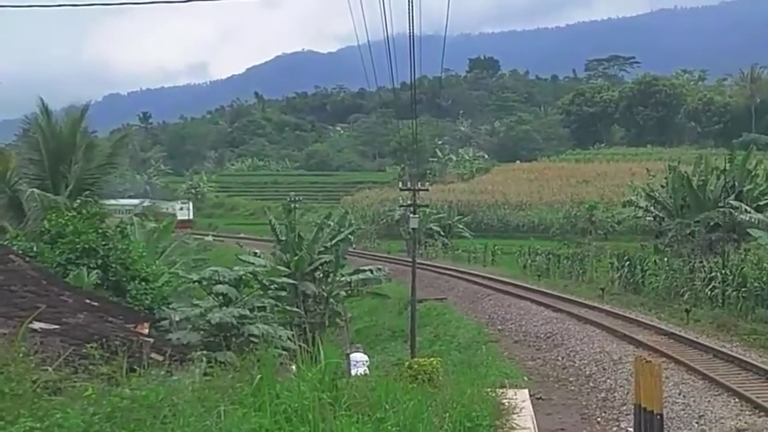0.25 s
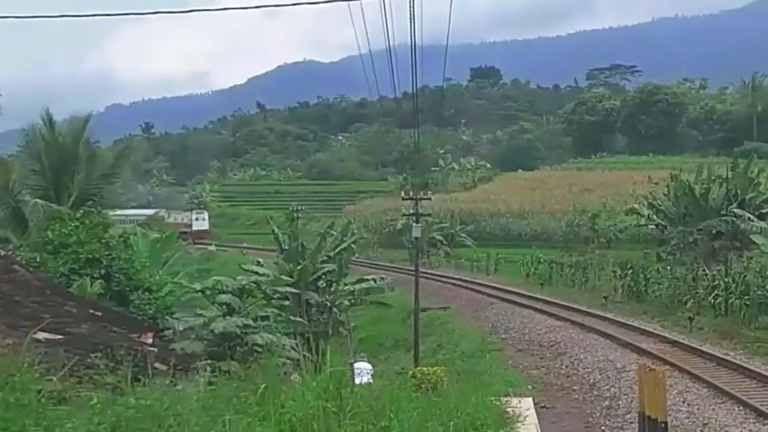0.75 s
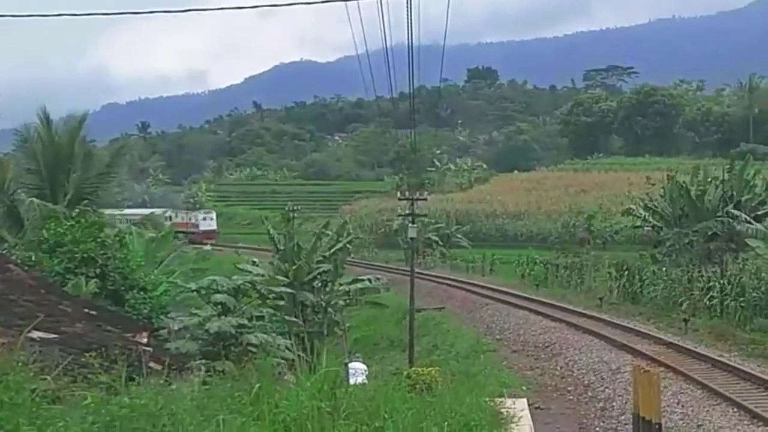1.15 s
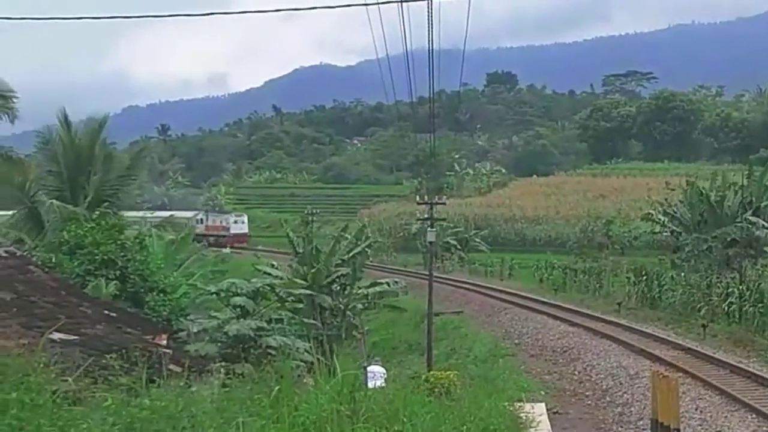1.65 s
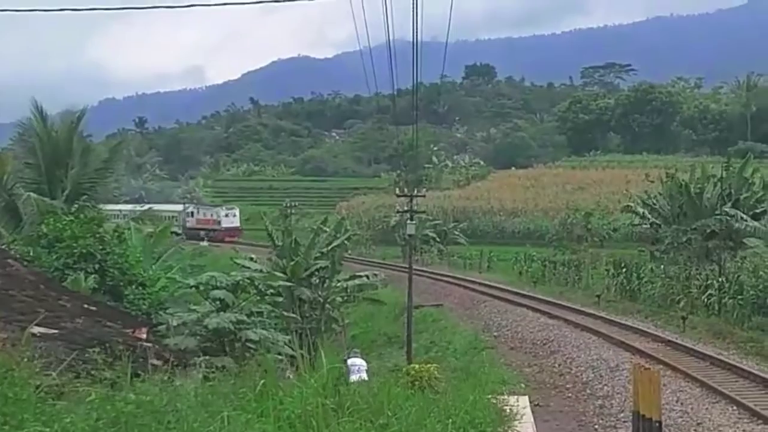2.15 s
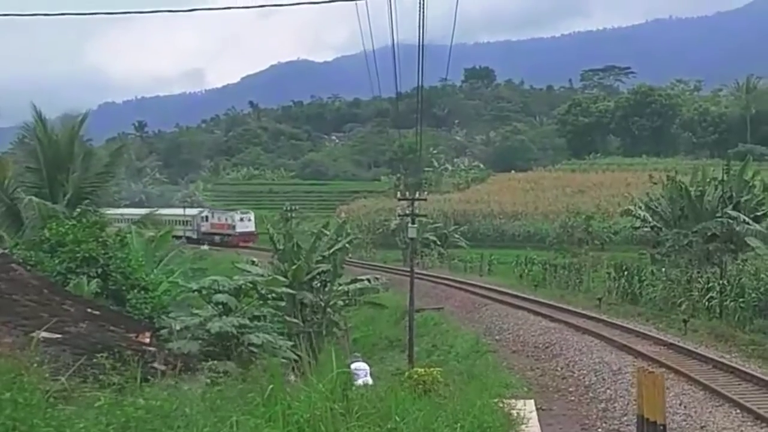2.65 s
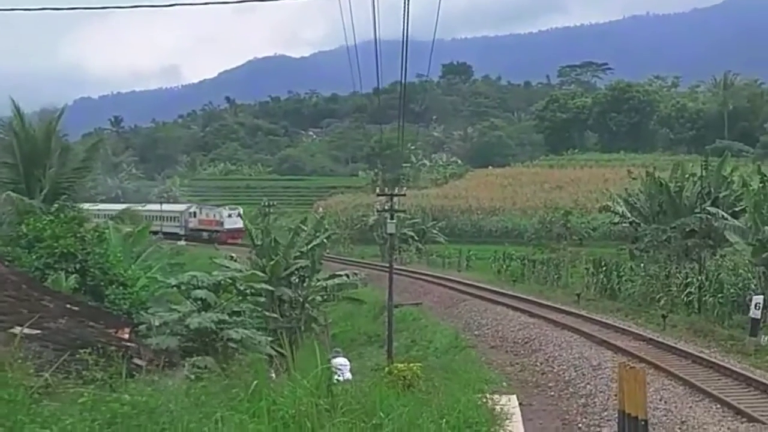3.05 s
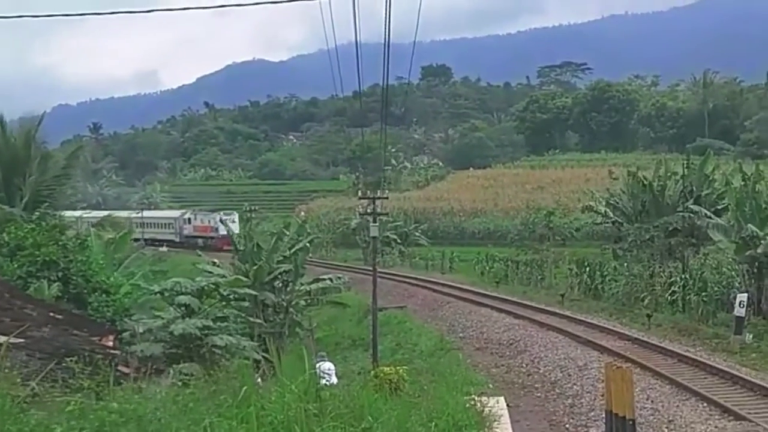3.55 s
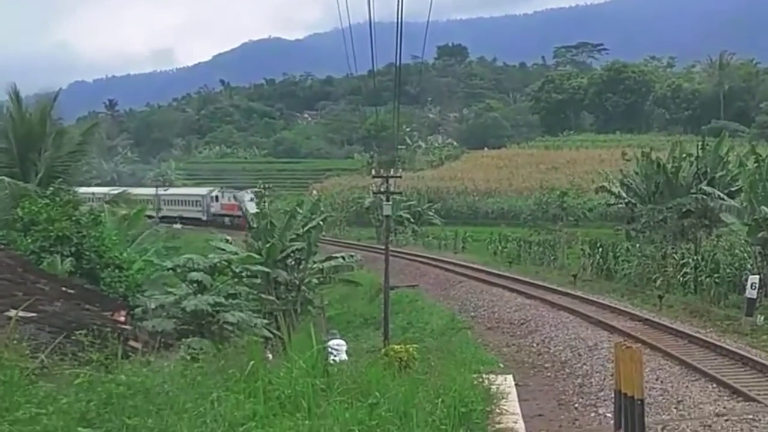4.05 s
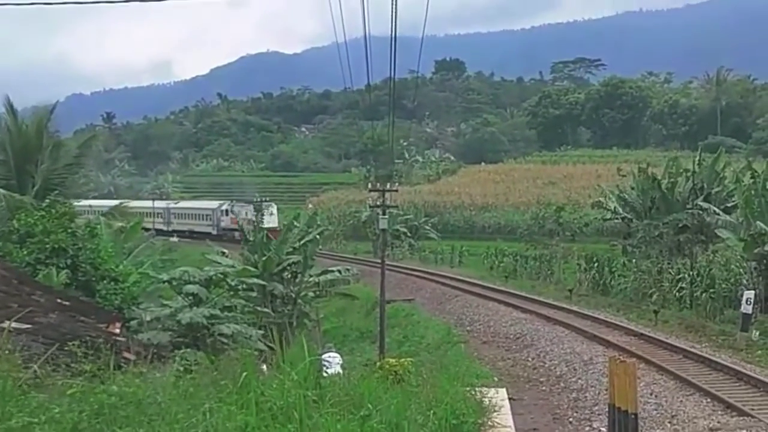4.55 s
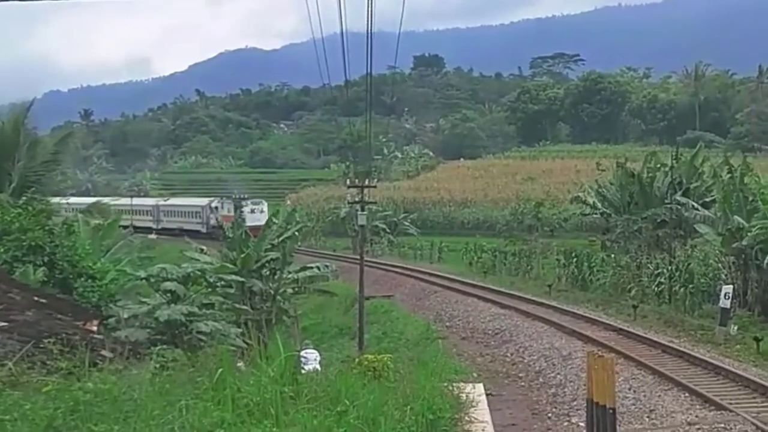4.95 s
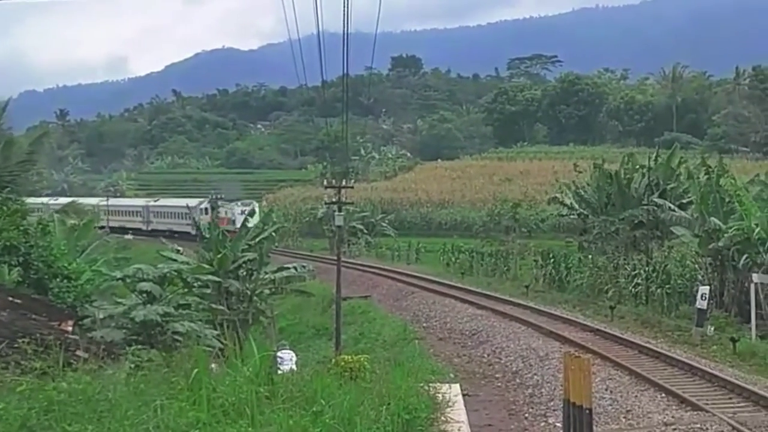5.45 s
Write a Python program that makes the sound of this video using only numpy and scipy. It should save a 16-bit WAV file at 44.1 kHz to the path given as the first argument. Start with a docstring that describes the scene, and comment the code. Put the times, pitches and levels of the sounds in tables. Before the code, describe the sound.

A far-off diesel locomotive pulls passenger cars closer around a bend, its deep throb and uneven chug pulsing rapidly over a soft rumble. Faint clatter and scrapes come from the wheels. Just before four seconds a rasping hiss flares in close spurts, then turns duller, and sharper knocks and louder thumps follow. Heard in mono from beside the track in quiet, open countryside.

```python
"""A deep throb with a chug on every engine cycle: a far-off diesel locomotive pulls cars, slowly nearing.
The throb is a cosine at half the firing rate of eight cylinders; short pressure pulses make the uneven chug.
Chopped noise makes a rasping hiss that flares in three close spurts and grows duller and smoother late on.
Resonant noise gives the clatter, decaying sines the knocks and thumps, narrow noise the scrapes in the bend.
Shaped steady noise gives the rumble of the cars and the hush of open country."""
import sys
import numpy as np
from scipy import signal
from scipy.fft import rfft, irfft
from scipy.io import wavfile
from scipy.ndimage import uniform_filter1d

SR = 44100
rng = np.random.default_rng(int(sys.argv[2]) if len(sys.argv) > 2 else 0)


def wrap_up_sound(samples):
    """Save the sound to the file named by the first command line argument, as 16-bit audio."""
    columns = np.atleast_2d(samples).T
    # keep every value between -1 and 1, then stretch to whole-number steps
    tamed = np.clip(columns, -1, 1)
    steps = np.round(tamed * 32767).astype(np.int16)
    wavfile.write(sys.argv[1], SR, steps)


N = 250929
T = np.arange(N) / SR  # time in seconds

CYCLE_HZ = 6.8225  # engine cycles per second
EDGE_HZ = 15600  # upper limit of the whole sound

# Exhaust as it carries over the fields, before trim. Each row: time in seconds, boom in dB, bark in dB.
EXHAUST_LEVELS = [(0, -41.5, -47), (0.4, -50.5, -48.5), (0.95, -42, -46.5), (1.25, -50, -45.0),
                  (1.6, -45, -52.5), (2.0, -41, -49), (2.45, -45.0, -51.0), (3.2, -42.5, -49.5),
                  (3.5, -41.5, -49), (3.8, -40, -46.5), (4.05, -41.5, -48.5), (4.6, -40.5, -44.5),
                  (4.78, -40.5, -50), (5.0, -36.5, -44.5), (5.15, -40.5, -48.5), (5.35, -35.5, -43),
                  (5.69, -35.5, -48)]
# Level of the throb before trim. Each row: time in seconds, level in dB.
THROB_LEVELS = [(0, -51), (0.5, -46), (1.4, -50), (2.3, -51), (2.65, -48), (3.6, -43), (3.95, -49.5),
                (5.15, -43.5), (5.69, -41)]
# Exhaust puffs of one engine cycle. Each row: place in the cycle (0-1), pitch in Hz,
# standard deviation of the envelope in seconds, level in dB relative to the boom or bark.
EXHAUST_PUFFS = [(0.408, 129.5, 0.0049, 9.5), (0.443, 227, 0.0019, 17), (0.513, 275, 0.0054, 6.5),
                 (0.561, 157, 0.018, 1.5), (0.628, 211.2, 0.018, 10), (0.663, 99.8, 0.019, 1.5),
                 (0.697, 314.3, 0.0053, 9), (0.78, 784, 0.012, -22.5), (0.97, 136.5, 0.018, 3.5),
                 (0.986, 218, 0.011, -7), (0.173, 98, 0.006, 0), (.17, 310, 0.0028, 11.5),
                 (0.252, 580, 0.003, -6)]
# Drone of the exhaust, smeared by the hills; each resonance is passed twice.
# Each row: centre in Hz, width of one pass in Hz, relative level in dB.
BOOM_RESONANCES = [(99, 27.5, 2.5), (131.6, 49, -0.5), (151, 26, -4.5)]
BARK_RESONANCES = [(224, 18.3, -0.5), (295.6, 40, -8), (341.3, 78, -9.5)]
# Share of exhaust power smeared by echoes, greatest while trees hide the locomotive
SMEAR_OPEN, SMEAR_HIDDEN = 0.17, 0.35
HIDDEN_MIDDLE_S, HIDDEN_LENGTH_S = 3.23, 2.4

# Spectra of the hollow rasp and the fizz. Each row: frequency in Hz, relative level in dB.
LOW_RASP_SPECTRUM = [(600, -7.5), (880, -19), (1010, -6.5), (1130, -1), (1260, -6), (1400, -18.5),
                     (1540, -6), (1680, -6.5), (1800, -10.5), (1930, -11), (2150, -18.5), (2700, -18.5)]
HIGH_RASP_SPECTRUM = [(1700, -17), (2150, -36), (2400, -4), (2650, -3), (2850, -5.5), (3200, 6), (3550, -2),
                      (4000, -8), (4700, -16.5), (6000, -9), (9000, -13)]
FIZZ_SPECTRUM = [(3500, -17), (5000, -17.5), (6200, -10), (7200, -3.5), (7900, 0), (9000, -2.5),
                 (10200, -1.5), (11200, -9.5), (12500, -21), (15500, -32)]
# Spurts of hiss. Each row: start in seconds, length in seconds, fizz in dB, low rasp in dB.
HISS_SPURTS = [(3.672, 0.036, -53.5, -41), (3.838, 0.46, -44.5, -47), (4.361, 0.12, -54, -49)]
HIGH_RASP_SPURT_DB = 0.5  # high rasp relative to low rasp in a spurt
# How each part follows a spurt. The row: attack in seconds, hang-on as a share of the spurt's length,
# release in dB per second.
FIZZ_ENVELOPE = (0.044, 0.03, 96)
LOW_RASP_ENVELOPE = (0.12, 0.71, 41)
HIGH_RASP_ENVELOPE = (0.46, 0.43, 41.5)
# The steady hiss swells for a while late on
CARRY_MIDDLE_S, CARRY_LENGTH_S, CARRY_DB = 4.54, 1.52, 5
# The hiss grows duller and smoother late on
DULLING_S, DULLING_TIME_CONSTANT_S = 4.34, 0.067
# Upper edges of the hiss: they sink with time or the dulling, and rise with the force of the fizz
RASP_TOP_HZ, RASP_SINK_HZ_PER_S, RASP_OPEN_HZ = 4840, 196, 3480
FIZZ_TOP_HZ, FIZZ_DULL_HZ, FIZZ_OPEN_HZ = 12500, 8940, 2900
# Depth of chopping before each layer's own scaling: at first, once dulled, extra in a spurt
CHOP_DB, CHOP_DULL_DB, CHOP_SPURT_DB = 3.5, 1.9, 1.43

# Spectrum of the running gear's rattle. Each row: frequency in Hz, relative level in dB.
CLATTER_SPECTRUM = [(300, -2), (430, 2.5), (520, -0.5), (640, 4.5), (770, 3), (900, -7.5), (1200, -44)]
# Louder grinding in the bend. Each row: middle in seconds, length in seconds, rise in dB.
BEND_GRINDS = [(2.51, 0.61, 6), (5.1, 1.27, 8)]
# Resonance of the running gear: centre, rms wander, and rise in pitch with the grinding
CLATTER_HZ, CLATTER_WANDER_HZ, CLATTER_RISE_HZ_PER_DB = 632, 29, 10.5
# Knocks, and late louder exhaust thumps. Each row: start in seconds, level in dB, pitch in Hz,
# time to decay by 60 dB in seconds.
KNOCKS_AND_THUMPS = [(.953, -50, 636, 0.26), (1.249, -58, 884, 0.091), (2.085, -54, 764, 0.14),
                     (2.455, -49, 760, 0.077), (2.742, -54, 766, 0.14), (3.703, -51, 1455, .06),
                     (3.849, -43, 1240, 0.06), (3.873, -38, 1180, 0.048), (4.656, -30.5, 1090, 0.031),
                     (4.682, -49, 1190, 0.094), (4.731, -39, 1137, 0.043), (4.786, -41, 1124, 0.027),
                     (4.877, -45, 1150, 0.033), (5.01, -36.5, 502, .042), (5.039, -29, 127, 0.049),
                     (5.309, -33.5, 663, 0.033), (5.335, -27, 126, 0.16)]

# Spectra of the cars' rumble and the open air. Each row: frequency in Hz, relative level in dB per Hz.
RUMBLE_SPECTRUM = [(8, -5.5), (25, -0.5), (38, -1), (55, -2.5), (75, -0.5), (95, -3), (200, -15.5),
                   (400, -23.5), (900, -36.5)]
AIR_SPECTRUM = [(400, 12), (1100, -1.5), (2000, 3.5), (4500, -6), (7000, -9), (10000, -7.5), (12500, -18),
                (15500, -20.5)]
AIR_DB = -67
# Soft scrapes as the wheels take the bend. Each row: middle in seconds, length in seconds, level in dB,
# centre in Hz, width of one of two resonator passes in Hz.
FLANGE_SCRAPES = [(0.063, 0.075, -60.5, 7500, 3200), (0.378, 0.24, -70.5, 1990, 450),
                  (0.99, 0.093, -64.5, 1380, 1200), (2.233, 0.56, -67, 2040, 2000),
                  (2.32, .22, -70.5, 5600, 2400), (2.35, 0.43, -66.5, 990, 396),
                  (2.907, 0.084, -63, 1640, 900), (2.996, 0.07, -72, 5200, 1510),
                  (3.404, 0.072, -62.5, 2050, 1410), (5.53, .3, -66, 1960, 700)]

# Growth of the steady layers as the train nears. The row: level at the start in dB, rise in dB per second.
CLATTER_NEARING = (-67.5, 0.31)
LOW_RASP_NEARING = (-69.5, 1.28)
HIGH_RASP_NEARING = (-78, 0.43)
FIZZ_NEARING = (-80.5, 1.73)
RUMBLE_NEARING = (-51, 0.55)


def amp(db):
    """Logarithmic level: decibels to amplitude gain."""
    return 10 ** (np.asarray(db) / 20)


def evened(x):
    """Power normalisation: scales to an rms of 1."""
    return x / np.sqrt(np.mean(x ** 2) + 1e-20)


def curves(rows):
    """Linear interpolation: the columns of a time table, one value a sample."""
    s, *columns = np.transpose(rows)
    return [np.interp(T, s, column) for column in columns]


def nearing(start_db, db_per_s):
    """Exponential growth: the gain of a layer rises by equal decibels each second as the train nears."""
    return amp(start_db + db_per_s * T)


def swell(middle_s, length_s):
    """Gaussian envelope: a smooth rise and fall, 0-1."""
    return np.exp(-2 * ((T - middle_s) / length_s) ** 2)


def drift(hz):
    """Low-passed noise: a random variation of rms 1, up to about this rate."""
    f = np.fft.rfftfreq(N, 1 / SR)
    lowpass = np.exp(-(f / hz) ** 2)
    return evened(irfft(rfft(rng.standard_normal(N)) * lowpass, N))


def coloured(x, points):
    """Spectral filtering: shapes a sound by a table of levels, with steep skirts beyond its ends."""
    hz, db = np.transpose(points)
    f = np.fft.rfftfreq(N, 1 / SR)
    gain = amp(np.interp(np.log(f + 1), np.log(hz), db))
    upper_skirt = 1 / (1 + (f / hz[-1] / 1.3) ** 8)
    lower_skirt = 1 / (1 + (hz[0] / (f + 1) / 1.3) ** 8)
    return evened(irfft(rfft(x) * gain * upper_skirt * lower_skirt, N))


def resonate_twice(x, hz, width):
    """Cascaded resonance: two band-pass resonators in series, of unit gain at the centre."""
    b, a = signal.iirpeak(hz, hz / width, fs=SR)
    return signal.lfilter(b, a, signal.lfilter(b, a, x))


def exhaust():
    """Periodic pressure: a throb at half the firing rate, the chug of puffs, and a drone filling the gaps."""
    boom_db, bark_db = curves(EXHAUST_LEVELS)
    boom_db, bark_db = boom_db + 0.08, bark_db - 2.5  # trim
    throb_db = curves(THROB_LEVELS)[0] + 3.0
    hidden = swell(HIDDEN_MIDDLE_S, HIDDEN_LENGTH_S)
    smear = np.clip(SMEAR_OPEN + (SMEAR_HIDDEN - SMEAR_OPEN) * hidden, 0, 1)
    beat = 2 * np.pi * (4 * CYCLE_HZ * T + 0.32)
    throb = amp(throb_db) * (np.cos(beat) + amp(-23.5) * np.cos(3 * beat))
    chug = puffs(boom_db, bark_db, vary_db=2.0, pitch_spread=0.085, jitter_s=0.0015, glide_per_s=0.64)
    echo = amp(boom_db - 1.2) * drone(BOOM_RESONANCES) + amp(bark_db) * drone(BARK_RESONANCES)
    # square roots share out the power
    return throb + np.sqrt(1 - smear) * chug + np.sqrt(smear) * echo


def puffs(boom_db, bark_db, vary_db, pitch_spread, jitter_s, glide_per_s):
    """Pulse excitation: each puff is a rounded burst of rising pressure swings, varying every engine cycle."""
    out = np.zeros(N)
    for place, hz, deviation_s, db in EXHAUST_PUFFS:
        turns = T * CYCLE_HZ - place + 1.5  # each puff is centred half-way between whole turns
        cycle = np.maximum(turns.astype(int), 0)
        chances = rng.standard_normal((round(N / SR * CYCLE_HZ) + 2, 3))
        strong, sharp, late = chances[cycle].T
        age = (turns % 1 - 0.5) / CYCLE_HZ - jitter_s * late
        pitch = hz * (1 + pitch_spread * sharp)
        swings = np.cos(2 * np.pi * pitch * age * (1 + glide_per_s * age))
        envelope = np.exp(-0.5 * (age / deviation_s) ** 2)
        carried_db = boom_db if hz < 190 else bark_db
        out += amp(carried_db + db + vary_db * strong) * envelope * swings
    return out


def drone(resonances):
    """Noise-driven resonance: turbulence rings in the stack, and little gets out between the resonances."""
    turbulence = rng.standard_normal(N)
    ring = sum(amp(db) * resonate_twice(turbulence, hz, width) for hz, width, db in resonances)
    return evened(ring)


def hiss():
    """Modulated turbulence: air chopped by the engine; in a spurt the fizz leads and the rasp lingers."""
    carry = amp(CARRY_DB * swell(CARRY_MIDDLE_S, CARRY_LENGTH_S))
    low_gain = carry * nearing(*LOW_RASP_NEARING)
    high_gain = carry * nearing(*HIGH_RASP_NEARING)
    fizz_gain = carry * nearing(*FIZZ_NEARING)
    for s, length, fizz_db, rasp_db in HISS_SPURTS:  # hypot adds powers
        low_gain = np.hypot(low_gain, amp(rasp_db) * spurt(s, length, *LOW_RASP_ENVELOPE))
        high_spurt = amp(rasp_db + HIGH_RASP_SPURT_DB) * spurt(s, length, *HIGH_RASP_ENVELOPE)
        high_gain = np.hypot(high_gain, high_spurt)
        fizz_gain = np.hypot(fizz_gain, amp(fizz_db) * spurt(s, length, *FIZZ_ENVELOPE))

    force = fizz_gain / fizz_gain.max()
    dulled = (1 + np.tanh((T - DULLING_S) / DULLING_TIME_CONSTANT_S)) / 2  # 0 before it dulls, 1 after
    chop_db = CHOP_DB + (CHOP_DULL_DB - CHOP_DB) * dulled
    chop_db += CHOP_SPURT_DB * low_gain / low_gain.max()
    rasp = chopped(0.53 * chop_db, spit_share=0.21, spits_per_s=130)
    spray = chopped(1.29 * chop_db, spit_share=0.45, spits_per_s=290)

    rasp_top = RASP_TOP_HZ - RASP_SINK_HZ_PER_S * T + RASP_OPEN_HZ * np.tanh(2 * force)
    fizz_top = FIZZ_TOP_HZ + (FIZZ_DULL_HZ - FIZZ_TOP_HZ) * dulled + FIZZ_OPEN_HZ * force ** 2
    low = coloured(rasp, LOW_RASP_SPECTRUM)
    low = wavering(low, patchy_db=4.0, patch_hz=260, patch_s=0.041)
    high = coloured(spray, HIGH_RASP_SPECTRUM)
    high = wavering(high, patchy_db=6.5, patch_hz=298.7, patch_s=0.035, top_hz=rasp_top)
    fizz = coloured(spray, FIZZ_SPECTRUM)
    fizz = wavering(fizz, patchy_db=1.5, patch_hz=400, patch_s=0.0083, top_hz=fizz_top)
    return low_gain * low + high_gain * high + fizz_gain * fizz


def spurt(start, length, attack_s, hang_share, release_db_per_s):
    """Attack and release: builds while the spurt lasts, hangs on, then decays exponentially; 0-1."""
    age = T - start
    rise = np.sin(np.pi / 2 * np.clip(np.minimum(age, length) / attack_s, 0, 1)) ** 2
    released_s = np.maximum(age - length * (1 + hang_share), 0)
    return rise * amp(-release_db_per_s * released_s)


def chopped(swing_db, spit_share, spits_per_s):
    """Amplitude modulation: spitting noise swells four times an engine cycle, between the throbs."""
    beat = np.cos(2 * np.pi * (4 * CYCLE_HZ * T - 0.07))
    share = np.clip(spit_share, 0, 1)
    spits = crackle(spits_per_s, vary_db=4.5, ring_s=0.0058)
    gain = amp(swing_db * np.tanh(1.22 * beat)) * (1 - share + share * spits)
    gain /= np.sqrt(uniform_filter1d(gain ** 2, round(SR / CYCLE_HZ)))  # even power over a cycle
    return gain * rng.standard_normal(N)


def crackle(per_s, vary_db, ring_s):
    """Shot noise: an envelope of random impulses, each with a sudden start and an exponential decay."""
    strengths = amp(vary_db * np.clip(rng.standard_normal(N), -2, 2))
    spits = (rng.random(N) < per_s / SR) * strengths
    return evened(signal.lfilter([1], [1, -np.exp(-1 / (ring_s * SR))], spits))


def wavering(x, patchy_db, patch_hz, patch_s, top_hz=EDGE_HZ):
    """Random spectral shading: patches of noise swell and fade, below an upper edge that may move."""
    hz, s, z = signal.stft(x, SR, nperseg=512, noverlap=384)
    bins, frames = max(1, round(patch_hz / hz[1])), max(1, round(patch_s / s[1]))
    patches = uniform_filter1d(rng.standard_normal(z.shape), bins, 0)
    patches = evened(uniform_filter1d(patches, frames, 1))
    top = np.interp(s, T, top_hz * np.ones(N))
    shade = 1 / np.sqrt(1 + (hz[:, None] / top) ** 20)
    shaped = z * shade * amp(patchy_db * patches)
    return evened(signal.istft(shaped, SR, nperseg=512, noverlap=384)[1][:N])


def clatter_and_knocks():
    """Forced and free vibration: running gear clatters in a wandering resonance; knocks and thumps decay."""
    grind_db = sum(db * swell(s, length) for s, length, db in BEND_GRINDS)
    ring_hz = CLATTER_HZ + CLATTER_RISE_HZ_PER_DB * grind_db + CLATTER_WANDER_HZ * drift(2.6)
    # a resonance that moves: shift to 0 Hz, low-pass, shift back
    turn = np.exp(2j * np.pi * np.cumsum(ring_hz) / SR)
    r = np.exp(-np.pi * 170 / SR)  # bandwidth 170 Hz
    rattle = chopped(1.7, spit_share=0.78, spits_per_s=70)
    rattle = (turn * signal.lfilter([1 - r], [1, -r], rattle / turn)).real
    out = nearing(*CLATTER_NEARING) * amp(grind_db) * coloured(rattle, CLATTER_SPECTRUM)
    for s, db, hz, t60 in KNOCKS_AND_THUMPS:
        age = np.maximum(T - s, 0)
        blow = (1 - np.exp(-age / 0.00039)) * amp(db - 60 * age / t60)
        phase = 2 * np.pi * hz * age + 0.49 * drift(130)  # random phase roughens the tone
        out += blow * np.sqrt(2) * np.sin(phase)
    return out


def air():
    """Stationary noise: the cars' far rumble wavers and slowly grows; the hush of the fields stays even."""
    rumble = coloured(rng.standard_normal(N), RUMBLE_SPECTRUM)
    rumble = nearing(*RUMBLE_NEARING) * amp(drift(1.8)) * rumble
    hush = amp(AIR_DB) * coloured(rng.standard_normal(N), AIR_SPECTRUM)
    return rumble + hush


def scrapes():
    """Friction noise: flanges brush the rail in short swells of narrow, grainy noise."""
    out = np.zeros(N)
    for s, length, db, hz, width in FLANGE_SCRAPES:
        grains = chopped(1.6, spit_share=1.0, spits_per_s=260)
        rub = evened(resonate_twice(grains, hz, width))
        out += amp(db) * swell(s, length) * rub
    return signal.sosfilt(signal.butter(6, 9500, fs=SR, output="sos"), out)


def scene():
    """Superposition: everything as it arrives beside the track, in one channel."""
    return (exhaust() + hiss() + clatter_and_knocks() + air() + scrapes())[None]


def record(dry):
    """Band limitation: a symmetric low-pass removes what lies above EDGE_HZ."""
    lowpass = signal.firwin(511, EDGE_HZ, window=("kaiser", 9), fs=SR)
    return signal.oaconvolve(dry, lowpass[None], "same")


dry = scene()
out = record(dry)
wrap_up_sound(out)
```